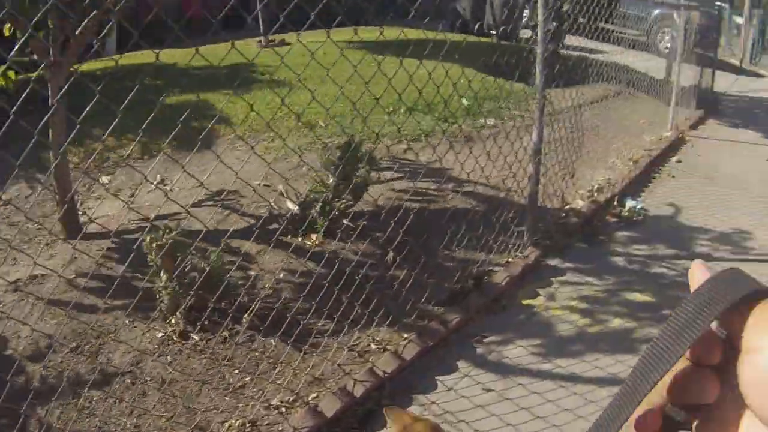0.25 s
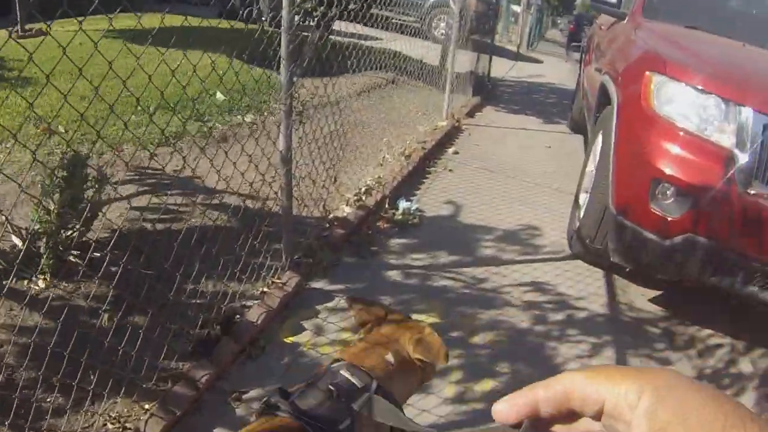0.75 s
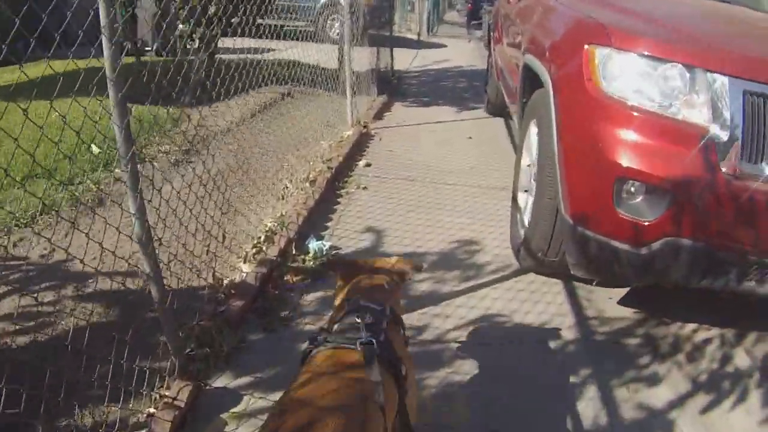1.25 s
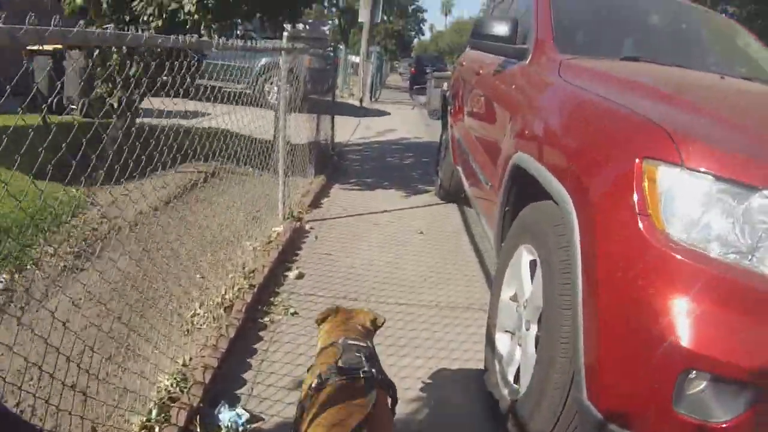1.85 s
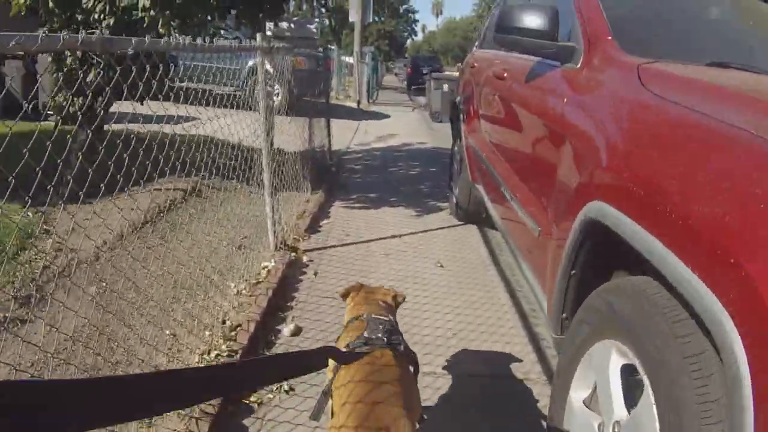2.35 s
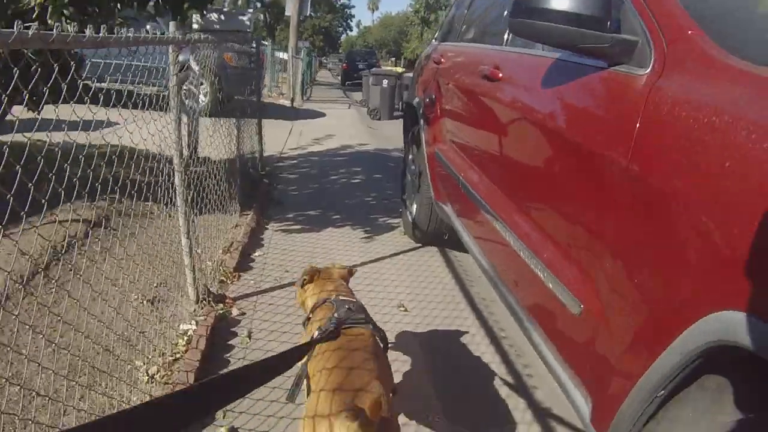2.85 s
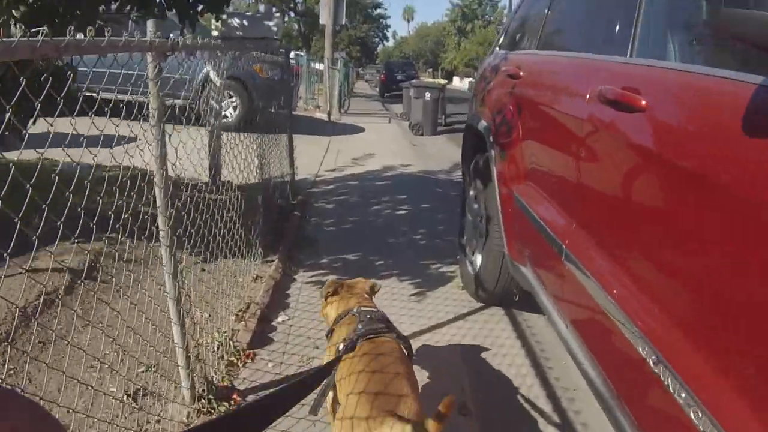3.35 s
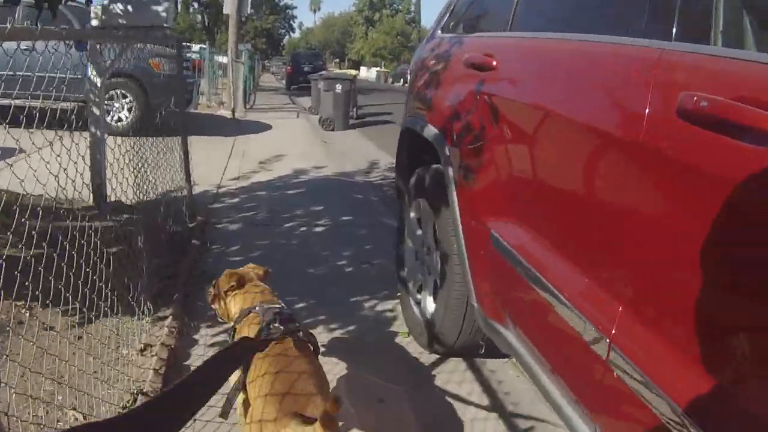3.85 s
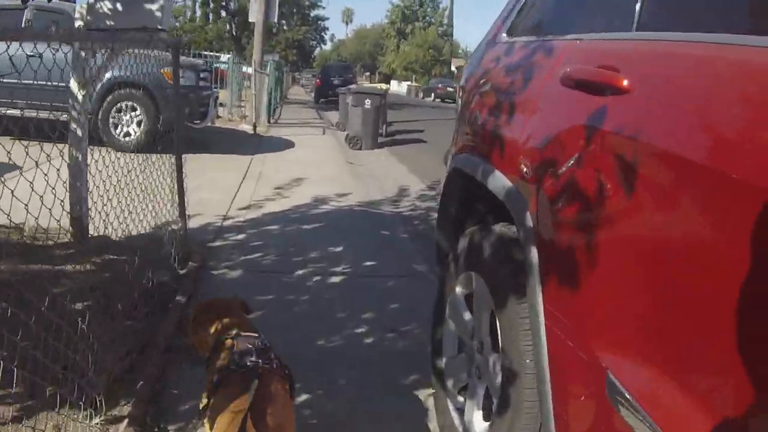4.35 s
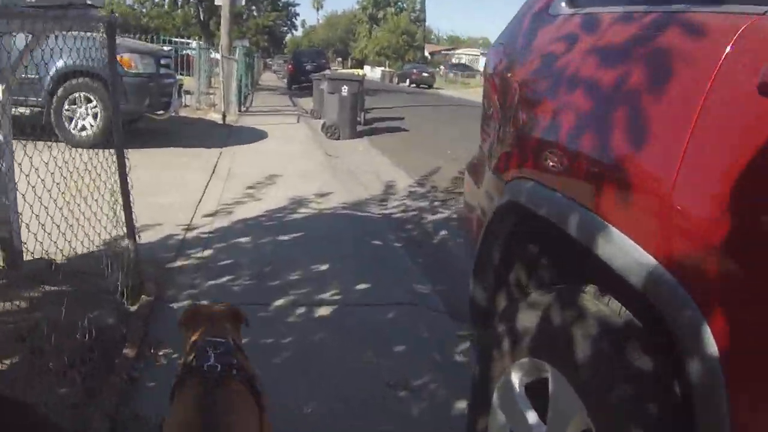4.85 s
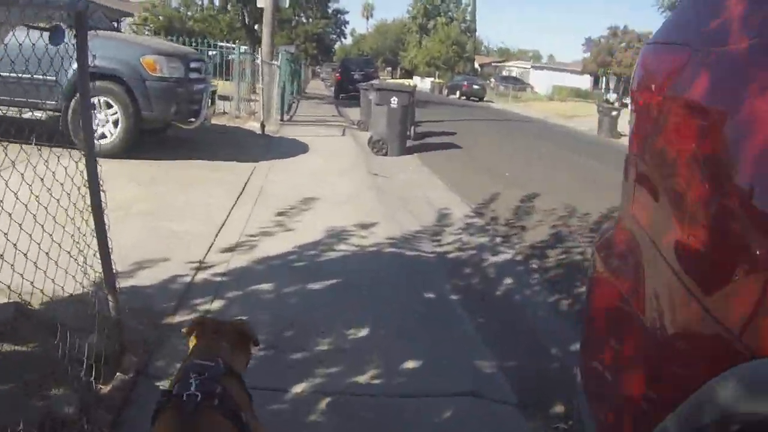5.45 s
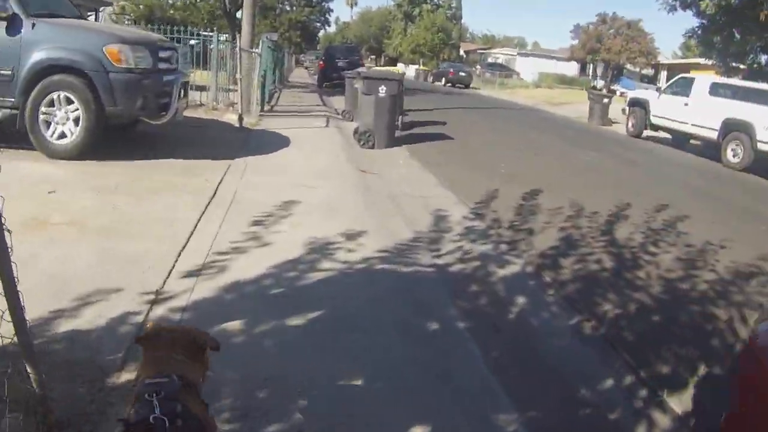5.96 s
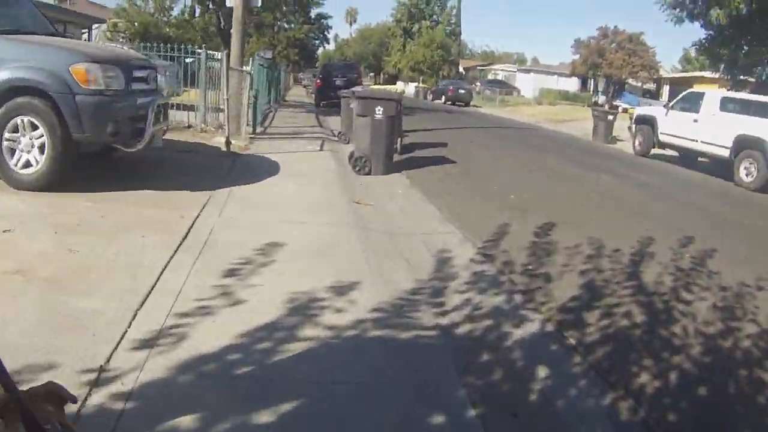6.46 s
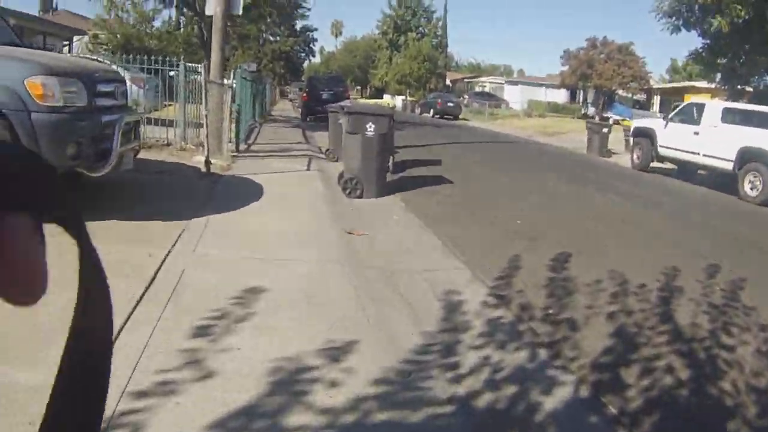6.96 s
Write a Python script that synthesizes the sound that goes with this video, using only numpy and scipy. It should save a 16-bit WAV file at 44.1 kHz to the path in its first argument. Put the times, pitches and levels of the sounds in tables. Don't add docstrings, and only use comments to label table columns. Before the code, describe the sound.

The microphone is sealed in a small plastic housing close behind a leashed dog, so everything is dry, boxy and near, with no room echo. A low steady hiss, thin high whine, faint fizz and weak ticks about ten times a second run throughout. The start is quiet, with a slight rub and tick, then a sharp hollow knock at 0.7 s and a tiny metallic chink at 0.9. Light ticks and scuffs follow until hard plastic clacks begin at 1.9 and 2.0. From 2.2 to 4.7 knocks, crisp taps, soft strap bumps and short muffled rubs come irregularly, strongest near 2.9, 3.0 and 3.7, with low lurches from footfalls. It thins out: a flat slap at 5.1, a knock at 5.7, a softer slap at 6.1. A small chink at 6.6 precedes closing knocks at 6.7, 6.9 and 7.0, then faint ticks.

```python
import sys
import numpy as np
from scipy import signal
from scipy.fft import rfft, irfft
from scipy.io import wavfile
from scipy.ndimage import uniform_filter1d

SR = 44100
rng = np.random.default_rng(int(sys.argv[2]) if len(sys.argv) > 2 else 0)


def file_out(sig):
    cols = np.atleast_2d(sig).T
    lim = np.clip(cols, -1, 1)
    pcm = np.round(lim * 32767).astype(np.int16)
    wavfile.write(sys.argv[1], SR, pcm)


def boost(x):
    u = np.asarray(x, float) / 20
    return 10 ** u


N = 318346

# frequency in Hz, density in dB per Hz.
HISS = [(100, -3.5), (300, 4.5), (1000, 4), (2000, 5.5), (4000, -1.5), (6500, -8), (8500, -11.5),
        (11500, -14), (15500, -13)]
# frequency in Hz, rms level in dB.
WHISTLES = [(5000, -82), (10999, -98), (11999, -93), (12999, -94), (13998, -98), (14998, -98)]

# start in seconds, length in seconds, level in dB, treble in dB
SLIDES = [(0.296, 0.217, -59.5, -12), (0.493, 0.117, -71.5, -14.5), (0.97, .12, -72, -5.5),
          (0.666, 0.1, -57, -11), (0.766, 0.211, -63, -6.5), (1.113, 0.252, -57.5, -8.5),
          (1.284, 0.054, -51, -10), (1.397, 0.0503, -54, -9), (1.445, 0.039, -61.5, -8.5),
          (1.633, 0.0678, -56, -6), (1.743, 0.1115, -52, -10), (1.881, 0.057, -47, -11),
          (2.076, 0.211, -50, -8.5), (2.28, 0.1435, -56, -9.5), (2.571, 0.0564, -51.5, -10),
          (2.709, 0.1046, -50, -10.5), (2.848, 0.049, -44, -9), (2.939, 0.11, -56, -14.5),
          (3.048, 0.084, -47.5, -8), (3.159, 0.1238, -50.5, -9), (3.316, 0.0948, -54, -8),
          (3.435, 0.0475, -59.5, -8), (1.518, 0.112, -67.5, -18), (2.421, 0.116, -62.5, -8.5),
          (3.525, 0.0787, -52.5, -8.5), (3.621, 0.059, -52, -6.5), (3.699, 0.0573, -52.5, -10),
                   (3.789, 0.0895, -48.5, -10), (3.998, 0.1415, -51.5, -9), (4.16, 0.074, -53.5, -7.5),
                   (4.25, 0.159, -55, -9), (4.424, 0.127, -53, -10.5), (4.606, 0.1147, -52.5, -7),
                   (4.75, 0.112, -53, -8), (4.963, 0.1686, -56.5, -9), (5.163, 0.0704, -52.5, -10),
                   (5.257, 0.1227, -56.5, -10.5), (5.511, 0.055, -59, -8), (5.628, 0.1048, -54.5, -10),
                   (5.76, 0.141, -59, -8.5), (5.951, 0.265, -61.5, -9.5), (6.22, 0.06, -56.5, -9.5),
                   (6.309, 0.087, -56, -9.5), (4.869, 0.094, -62, -8.5), (5.387, 0.094, -63, -16),
                   (6.44, 0.171, -61, -11.5), (6.66, 0.154, -56.5, -9.5), (6.856, 0.074, -51.5, -9.5),
                   (6.946, 0.0656, -56.5, -4), (7.098, 0.0357, -55.5, -9.5)]
# start in seconds, length in seconds, level in dB.
LURCHES = [(.75, 0.154, -54), (1.2, 0.065, -48), (1.28, 0.142, -52), (1.75, 0.114, -39.5),
           (1.88, 0.1706, -41), (2.18, 0.215, -44.5), (2.7, 0.229, -42), (3.14, 0.0994, -40),
           (3.28, 0.076, -46.5), (3.66, 0.081, -37.5), (3.8, 0.0726, -37), (4.08, 0.096, -37),
           (4.44, 0.07, -53), (4.62, 0.0783, -37.5), (5.1, 0.077, -45), (5.22, 0.0557, -47),
           (5.65, 0.0532, -38.5), (6.1, 0.095, -47.5), (6.7, 0.102, -43.5), (6.86, 0.127, -38.5),
           (1.58, .1, -54), (2.45, 0.046, -55.5), (3.42, 0.056, -50.5), (4.23, 0.059, -44.5),
           (4.8, 0.0574, -46), (5.85, 0.068, -52.5), (6.28, 0.114, -54.5)]
# frequency in Hz, width in Hz, level in dB.
RUB_RING = [(1207, 41.7, 15), (1822, 245, 21), (2066, 219.5, 18), (2480, 300, -84)]
RUB_TREBLE = [(3216, 391, 10), (3578, 29, -2), (4250, 599, 7), (5195, 1490, 4.5), (5950, 600, -47),
              (7810, 740, -13), (8600, 556, -3.5)]
RUB_BODY = [(123.3, 91.6, 7.5), (188.7, 170.3, 8), (292.3, 219, 5), (517.5, 174, 0.5), (671, 234, -3),
            (830, 95, -26.5)]

# start in seconds, body peak in dB, thud in dB relative to it, contact in ms.
BUMPS = [(0.242, -46.5, -20.5, 1), (0.708, -31.5, -5, 0.88), (1.287, -48, 7.5, 0.93), (2.188, -40, -18, 1),
         (2.2238, -24.5, -3.5, 0.625), (2.704, -25, -8.5, 0.72), (3.146, -33.5, -6, 1),
         (3.648, -32.5, -2, 0.69), (3.668, -28, -6.5, 0.69), (3.941, -39, 0, 0.4), (4.623, -32, -1.5, 0.98),
         (4.954, -43, 0.5, 0.56), (6.713, -23.5, -24, 0.4)]
BUCKLE_BUMPS = [
    (3.6275, -29, -4.5, 0.41),
]
# frequency in Hz, t60 in seconds, sign, level in dB under webbing, level in dB under the buckle.
PUSHED_WALLS = [(313.5, 0.0384, 0.703, -1, -1), (513, 0.058, 1, -17, -16), (678, 0.0234, 0.673, -1, 6),
                (1195, 0.0238, 0.74, -3.5, 7.5), (1660, 0.0129, 0.925, -7, 8.5)]

# start in seconds, ring peak in dB, ring in Hz, crack in dB relative.
TICKS = [(0.3985, -55, 1660, -18), (0.4759, -35.5, 1777, -12), (1.1147, -52, 1750, -18),
         (1.223, -40.5, 1660, -17.5), (1.311, -38, 1650, -18), (1.3423, -34.5, 1772, -18.5),
         (1.7424, -36.5, 1902, -4), (1.8188, -37.5, 2200, -17), (3.7913, -44.5, 1600, -18),
         (4.121, -38, 1682, -16.5), (4.787, -36, 1792, -10), (5.043, -32.5, 1680, -11.5),
         (5.154, -38.5, 1850, -16.5), (5.21, -42.5, 1690, -18), (5.2804, -43.5, 1880, -17.5),
         (5.5332, -37, 1660, -18.5), (6.0338, -39.5, 1828, -5), (6.08, -37.5, 1660, -19),
         (6.543, -44.5, 1970, -18), (7.125, -35.5, 1652, -17), (7.1983, -46, 1650, -19),
         (1.327, -35.5, 2010, -18.5), (1.4251, -42, 1734, -18), (4.148, -39.5, 1750, -20),
         (2.927, -46.5, 2174, -17.5)]
# start in seconds, ring peak in dB, then thud, body and crack in dB relative to it.
TAPS = [(1.7815, -23.5, -22, -12.5, -20), (2.2923, -30, -26, -22.5, -13.5),
        (2.3766, -17.5, -24.5, -33, -13.5), (3.108, -29, -33, -24.5, -18),
        (3.1551, -35.5, -1, -20.5, -17.5), (3.196, -27, -27, -34.5, -14), (3.3501, -23, -22, -49, -15),
        (3.49, -24, -21, -36, -11), (4.2736, -20.5, -21.5, -39.5, -14.5),
        (4.4295, -19.5, -21.5, -22.5, -17.5), (5.4445, -36.5, -10.5, -11.5, -23),
        (5.8225, -28, -16.5, -39.5, -13.5), (5.9689, -31.5, -18, -14, -11), (6.4586, -30, -16.5, -23, -16),
        (6.8717, -22, -28, -19, -9)]
# frequency in Hz, t60 in seconds, sign, level in dB.
TAPPED_WALLS = [(1240.3, 0.0161, -1.11, -11), (1661, 0.0109, -0.645, -0.5), (2100, 0.0058, -1.01, -0.5),
                (2385, 0.0093, 0.84, -3)]
# travel in ms, rebound delay in ms, rebound in dB, rattle in dB,
# rattle t60 in seconds, thud delay in ms.
LIGHT_BLOW = (0.3059, 4.18, -32.5, -25.5, 0.0066, 0.34)
# frequency in Hz, t60 in seconds, sign, then level in dB when
THUD = [(105.9, 0.0683, -0.079, 17, 8.5, 15.5), (196.4, 0.00483, -1.35, -2, -8, -2.5)]
BODY = [(316.1, 0.076, 0.66, -3, -1, 3.5), (508.7, 0.13, -0.68, -17.5, -12.5, -8),
        (733, 0.028, 1, -3.5, 3.5, 2), (934, 0.028, 0.24, -23, -3, -21.5)]
CRACK = [(2993.4, 0.00835, -0.697, -3, 8, 8), (3512, 0.0266, 0.076, 5, 5.5, -14.5),
         (4160, 0.0085, 0.614, -3.5, -0.5, 3.5), (4539, 0.0232, -0.488, -13.5, -14, -13.5),
         (5026, 0.0117, 0.896, -8, -15.5, -7.5), (5930, 0.00826, -1.52, -19, -22.5, -8),
         (7010, 0.00422, 1.34, -8, -34, -10), (8565, 0.00463, -1.334, -9, -28, -6),
         (10640, 0.00197, 1.1, -10.5, -31, -29), (13300, 0.0025, 0.5, -19, -27.5, -25)]
# frequency in Hz, t60 in seconds, sign, level in dB.
ROCKING = [(66, 0.045, -1, 0)]

# start in seconds, peak in dB, centre in Hz, length in ms, width in Hz.
CHINKS = [(.907, -46.5, 10160, 5.6, 500), (0.908, -45, 4910, 5.6, 1000), (.908, -56.5, 7200, 5, 900),
          (.911, -47.5, 3260, 4.2, 600), (1.69, -62, 9800, 14, 700), (3.607, -60, 10140, 7, 200),
          (4.15, -53, 10060, 12, 1500), (4.161, -54.5, 9830, 8.2, 700), (6.627, -41, 3310, 2.3, 500),
          (6.628, -48, 4730, 2.36, 700), (6.628, -58.5, 7500, 3.2, 530), (6.742, -47.5, 3420, 3.1, 250),
          (6.91, -54.5, 11000, 36, 6000), (2.674, -50.5, 3350, 36, 240), (.711, -61.5, 10500, 12, 5000),
          (.78, -64, 10000, 4, 4000), (3.616, -60.5, 13500, 4, 3000), (3.626, -62, 13000, 4, 3000)]
BRUSHES = [
    (1.113, -47.5, 1050, 3.8, 300),
    (1.115, -52, 3290, 6, 700),
    (5.09, -48, 189, 16.4, 70),
    (6.755, -42, 85, 15, 60),
    (6.94, -41.5, 817, 39, 110),
    (.55, -49, 298, 4.94, 250),
    (1.927, -31, 1905, 6.6, 900),
]
# frequency in Hz, t60 in seconds, sign, level in dB.
RINGING_TAG = [(12200, .045, 1, 1.5), (11000, .04, 1, -6.5)]

# start in seconds, ring peak in dB, then thud, body and crack in dB relative to it.
SWINGS_IN = [(0.7297, -6.5, -10.5, -16, -18), (2.0175, -9.5, -11, -8.5, -26.5),
             (2.2266, -16, -23.5, -21, -45), (2.7111, -21, -26.5, -16.5, -39.5),
             (2.9945, -8, -11.5, -9.5, -24.5), (3.6825, -5, -13, -15, -18), (3.9688, -13, -10.5, -8, -34),
             (4.6619, -11.5, -13.5, -11, -16.5), (5.6702, -16.5, -11, -7.5, -24),
             (6.7245, -15, -14, -14, -27), (6.9747, -8, -11.5, -6.5, -24)]
SWINGS_BACK = [
    (1.9328, -5, -9.5, -15.5, -16.5),
    (2.8858, -4.5, -9, -16.5, -14.5),
    (3.8594, -10, -7, -10.5, -21.5),
    (4.4786, -19.5, -4.5, -13.5, -42.5),
]
GLANCING = [
    (6.9073, -8.5, -7, -8.5, -19),
]
# frequency in Hz, t60 in seconds, sign, level in dB.
WALLS_IN = [(312.4, 0.071, 1, -17), (495, 0.0756, -0.45, -32), (696.8, 0.0278, 1, -10.5),
            (1049.6, 0.0276, -1.2, -16.5), (1245.4, 0.01426, -1.15, -2), (1493.5, 0.0143, 0.873, -7.5),
            (1726.5, 0.0228, -1.074, 8), (1931, 0.0178, 0.808, 2.5), (2109.7, 0.014, -0.993, 9),
            (2476, 0.0098, 0.915, 5)]
WALLS_BACK = [(300, 0.0423, -0.684, -6), (500, 0.047, -1.5, -18.5), (741, 0.01494, 0.844, -6.5),
              (996, 0.00627, 0.99, 5.5), (1203.2, 0.0181, -1.02, 2.5), (1480, 0.0172, 0.98, -18.9),
              (1650, 0.0141, -1.09, 7), (1762.3, 0.0166, 1, 9.5), (1975, 0.00677, -1.074, 6.5),
              (2455, 0.008, 0.975, 9)]
WALLS_EDGE = [(343.7, 0.055, 1, -16.5), (546, 0.0272, -1, -9.5), (640.7, 0.0375, 0.99, -9.5),
              (1028, 0.00536, -0.895, 10.5), (1183, 0.0486, -1.03, -5.5), (1441, 0.034, -0.9, -4.5),
              (1677, 0.0282, -1.06, -1.05), (1853, 0.0224, -1.01, 6), (2069, 0.0118, 1, 7.5),
              (2233, 0.01465, -1, 15.5)]
# frequency in Hz, t60 in seconds, sign, level in dB.
THUD_IN = [(66.1, 0.06, -0.92, -7), (107.5, 0.0576, -1.01, -4), (177.8, 0.083, -1.05, -23)]
THUD_BACK = [(70, 0.0564, 1, 0.5), (100.1, 0.069, 1, -7.5), (208.8, 0.0249, 0.994, -9)]
# frequency in Hz, t60 in seconds, sign, level in dB swinging in,
# level in dB swinging back.
PANELS = [(495.8, 0.1473, -1.02, -7, -8.5), (1190.3, 0.072, 0.91, -25, 0.0),
          (1901.4, 0.0666, -1.06, 0.5, -24.5), (4654, 0.048, 1, -13.5, -31)]
# contact in ms, rise in ms, rebound delay in ms, rebound share, delay of the slow
# parts in ms, crack delay in ms, second crack in ms after it, its level in dB, rattle in dB,
# rattle t60 in seconds, first touch in ms.
BLOW_IN = (0.5592, 0.3274, 1.13, -0.0743, 0.69, 0.88, -0.4951, -9, -29, 0.054, 0.09)
BLOW_BACK = (0.534, 1.0, 1.4366, 0.6223, 1.5339, 1.0, 1.65, -5, -27.5, 0.1443, -0.43)
BLOW_EDGE = (0.57, 1.5, 2.5, 0.43, 1, 1.9, -0.1, -1.5, -20, 0.0551, -0.28)

# start in seconds, peak in dB, thud in dB relative to it.
SLAPS = [
    (5.0738, -22.5, -13.5),
    (6.1085, -26.5, -13.5),
]
PATS = [
    (1.7797, -22.5, -30),
    (4.0938, -23.5, -17.5),
    (4.1418, -27, -6.5),
]
# frequency in Hz, t60 in seconds, sign, level in dB.
SLAPPED_WALLS = [(309, 0.00636, 1, 11.5), (484, 0.1, -0.95, -31.5), (690, 0.00613, 0.99, 10),
                 (1261, 0.036, -0.99, -5), (1730, 0.03, -1.004, 10), (2177, 0.0202, -1.02, 10)]
PATTED_WALLS = [(316.2, 0.0376, 0.98, -1.23), (515, .1, 0.98, -27.5), (687, 0.0355, 1, -3),
                (996, 0.00494, 0.98, 18), (1132, 0.049, -1.01, 9)]
STRAP_THUD = [(118.3, 0.0353, 1, 0)]

# start in seconds, length in seconds.
TOP_DROPOUTS = [(0.473, 0.02), (0.719, 0.008), (0.898, 0.007), (1.786, 0.009), (2.019, 0.01),
                (2.222, 0.018), (2.383, 0.008), (2.691, 0.008), (2.719, 0.015), (2.885, 0.019),
                (3.182, 0.02), (3.493, 0.009), (3.644, 0.01), (3.658, 0.017), (3.851, 0.007), (3.95, 0.022),
                (3.98, 0.012), (4.27, 0.021), (4.42, 0.02), (4.449, 0.03), (4.655, 0.019), (5.063, 0.009),
                (5.528, 0.018), (5.657, 0.014), (5.806, 0.02), (5.955, 0.021), (6.449, 0.017),
                (6.627, 0.011), (6.702, 0.02), (6.852, 0.017), (6.874, 0.024)]


def unit(x):
    return x / np.sqrt(np.mean(x ** 2))


def band(x, hz, width):
    return signal.lfilter(*signal.iirpeak(hz, hz / width, fs=SR), x)


def walk(rate):
    k = int(SR / rate)
    steps = np.repeat(rng.standard_normal(N // k + 1), k)
    return unit(uniform_filter1d(uniform_filter1d(steps, k), k)[:N])


def add(out, sound, s):
    i = int(s * SR)
    out[i:i + len(sound)] += sound[:len(out) - i]


def swells(rows, edge_s):
    out = np.zeros(N)
    for s, length, db in rows:
        t = np.arange(int((length + edge_s) * SR)) / SR
        ends = np.clip(np.minimum(t, length + edge_s - t) / edge_s, 0, 1)
        add(out, (boost(db) * np.sin(np.pi / 2 * ends)) ** 2, s - edge_s / 2)
    return out


def slide_power(treble=False):
    rows = [(s, length, db + treble * treble_db)
            for s, length, db, treble_db in SLIDES]
    return swells(rows, 0.04)


def ring(modes, column, contact_ms, rise_ms):
    hz, t60, sign, db = np.array(modes)[:, [0, 1, 2, column]].T
    pitch_chance, level_chance = rng.standard_normal((2, len(hz)))
    t = np.arange(SR // 6)[:, None] / SR
    walls = np.cos(2 * np.pi * hz * (1 + 0.00237 * pitch_chance) * t) * np.exp(-np.log(1000) * t / t60)
    walls = walls @ (sign * boost(db + 0.5 * level_chance))
    walls = walls * (1 - np.exp(-(t[:, 0] * 1000 + 0.00297) / rise_ms))
    u = np.arange(256) / SR / (max(contact_ms, 0.05) / 1000)
    push = np.sin(np.pi * u[u < 1]) ** 2
    out = np.convolve(walls, push)[:len(t)]
    return out / np.abs(out).max()


def loose_rattle(hz, width, t60):
    t = np.arange(SR // 6) / SR
    noise = rng.standard_normal(len(t))
    for _ in range(3):
        noise = band(noise, hz, width)
    return unit(noise) * np.exp(-np.log(1000) * t / t60)


def hiss():
    hz, db = np.transpose(HISS)
    bins_hz = np.arange(1, N // 2 + 2) * SR / N
    colour = boost(np.interp(np.log(bins_hz), np.log(hz), db))
    return boost(-62.5) * unit(irfft(rfft(rng.standard_normal(N)) * colour, N))


def clock_whistles():
    t = np.arange(N) / SR
    return sum(boost(db) * np.sqrt(2) * np.sin(2 * np.pi * hz * t) for hz, db in WHISTLES)


def sparks():
    spark_s, gap_s, jitter = 0.0012, 0.0088, 0.12
    pace, level = rng.standard_normal((int(N / SR / gap_s / 2) * 3, 2)).T
    at = (np.cumsum(gap_s * np.exp(jitter * pace)) * SR).astype(int)
    train = np.zeros(N)
    train[at[at < N]] = boost(3.0 * level[at < N])
    return unit(0.3 + np.convolve(train, np.hanning(int(2 * spark_s * SR)), "same"))


def fizz():
    period_s, peak_s, width_s = 0.284, 0.19, 0.0314
    t = np.arange(N) / SR
    off_peak = (t - peak_s + period_s / 2) % period_s - period_s / 2
    awake = boost(-86.5) + boost(-83.5) * np.exp(-(off_peak / width_s) ** 2 / 2)
    shaken = boost(-37.5) * np.sqrt(slide_power())
    noise = unit(band(band(rng.standard_normal(N), 10370, 900), 10370, 1100))
    return (awake + shaken) * sparks() * noise


def radio_ticks():
    start_s, period_s, burst_s = 0.0395, 0.10238, 0.0032
    t = np.arange(N) / SR - start_s
    beat = (t // period_s).astype(int) + 1
    level = boost(-67 + 3.0 * rng.standard_normal(beat.max() + 1))[beat]
    ticks = level * (t % period_s < burst_s) * rng.standard_normal(N)
    return band(ticks, 4400, 5000) + boost(2.5) * band(ticks, 9850, 6000)


def rubbing(lurch):
    grains = np.minimum(rng.exponential(size=N // 60 + 1), 2.5).repeat(60)[:N]
    grit = rng.standard_normal(N) * boost(1.9 * grains)
    slide = slide_power()
    handling = boost(-61.5) ** 2 + boost(-4.5) ** 2 * slide + boost(-16) ** 2 * lurch
    slips = boost(1.8 * walk(70))
    out = np.zeros(N)
    for power, peaks, top_hz in ((slide + boost(-73) ** 2, RUB_RING, 2470),
                                 (slide_power(treble=True) + boost(-77) ** 2, RUB_TREBLE, 6400),
                                 (handling, RUB_BODY, 1020)):
        dull = signal.sosfilt(signal.butter(3, top_hz, fs=SR, output="sos"), grit)
        colour = np.zeros(N)
        for hz, width, db in peaks:
            resonance = unit(band(band(dull, hz, width), hz, 3 * width))
            colour += boost(db + 2.0 * walk(14)) * resonance
        out += np.sqrt(power) * slips * unit(colour)
    return out


def lurching(lurch):
    sway = unit(band(band(rng.standard_normal(N), 20.55, 31.7), 20.55, 31.7))
    tremor = unit(band(band(rng.standard_normal(N), 67.2, 76), 67.2, 76))
    moving = np.sqrt(lurch + boost(-63.5) ** 2) * sway + boost(-66.5) * tremor
    return moving * boost(1.8 * walk(31))


def bumps():
    out = np.zeros(N)
    for table, column, travel_s in ((BUMPS, 3, 0), (BUCKLE_BUMPS, 4, 0.0008)):
        for s, db, thud_db, contact_ms in table:
            walls = ring(PUSHED_WALLS, column, contact_ms, 0.27)
            thud = boost(thud_db) * ring(THUD, 3, 0.715, 0.33)
            add(out, boost(db + 2.0) * (walls - thud), s + travel_s)
    return out


def light_knocks(table, walls, way):
    travel_ms, rebound_ms, rebound_db, rattle_db, rattle_s, slow_ms = LIGHT_BLOW
    tapped = 5
    out = np.zeros(N)
    for s, db, thud_db, body_db, crack_db in table:
        s += travel_ms / 1000
        slow_s = s - 0.0003 + slow_ms / 1000
        thud = ring(THUD, tapped, 1.0, 0.19) + boost(-34) * ring(ROCKING, 3, 2.5, 0.26)
        add(out, way * boost(db + thud_db + 6.5) * thud, slow_s)
        add(out, way * boost(db + body_db + 2.5) * ring(BODY, tapped, 0.18, 0.25), slow_s)
        for ms, share_db in ((0, 0), (rebound_ms, rebound_db)):
            quick = ring(walls, 3, 0.388, 0.4) + boost(crack_db + 1.0) * ring(CRACK, tapped, 0.154, 1.0)
            add(out, way * boost(db - 3.0 + share_db) * quick, s - 0.0006 + ms / 1000)
        add(out, boost(db + rattle_db) * loose_rattle(1540, 1800, rattle_s), s)
    return out


def wall_ticks():
    out = np.zeros(N)
    for s, db, hz, crack_db in TICKS:
        one_wall = [(hz, 0.022, 1, 0)]
        out += light_knocks([(s, db + 3.5, -22, -26, crack_db)], one_wall, 0.5)
    return out


def chinks_and_brushes():
    out = np.zeros(N)
    for s, db, hz, ms, width in CHINKS + BRUSHES:
        u = np.arange(SR // 20) / SR / (ms / 1000)
        burst = rng.standard_normal(len(u)) * u ** 0.35 * np.exp(-1.5 * u ** 2)
        rattle = band(band(burst, hz, width), hz, 2 * width)
        add(out, boost(db) * rattle / np.abs(rattle).max(), s)
    add(out, boost(-55.5) * ring(RINGING_TAG, 3, 0.05, 1.0), 0.907)
    return out


def hard_swings(table, walls, thud, column, blow):
    (contact_ms, rise_ms, rebound_ms, rebound_share, slow_ms, crack_ms,
     again_ms, again_db, rattle_db, rattle_s, early_ms) = blow
    out = np.zeros(N)
    for s, db, thud_db, body_db, crack_db in table:
        s += early_ms / 1000
        quick = boost(db) * ring(walls, 3, contact_ms, rise_ms)
        add(out, quick, s)
        add(out, rebound_share * quick, s + rebound_ms / 1000)
        slow = boost(db + thud_db) * ring(thud, 3, 0.067, 1.0)
        slow = slow + boost(db + body_db - 15) * ring(PANELS, column, 0.172, 2.3)
        add(out, slow, s + slow_ms / 1000)
        crack_contact_ms = 0.0818 + 0.3034 * crack_db
        for ms, less_db in ((0, 0), (again_ms, again_db)):
            crack = ring(CRACK, column, crack_contact_ms, 0.95)
            add(out, boost(db + crack_db + less_db) * crack, s + (crack_ms + ms) / 1000)
        add(out, boost(db + rattle_db) * loose_rattle(1635, 2000, rattle_s), s + 0.0008)
    return out


def slaps():
    out = np.zeros(N)
    for table, modes, contact_ms, rise_ms, bounce in ((SLAPS, SLAPPED_WALLS, 0.78, 1.0, -0.34),
                                                      (PATS, PATTED_WALLS, 1.9, 0.05, 0)):
        for s, db, thud_db in table:
            thud = boost(thud_db) * ring(STRAP_THUD, 3, contact_ms, rise_ms)
            push = boost(db) * (ring(modes, 3, contact_ms, rise_ms) + thud)
            add(out, push, s)
            add(out, bounce * push, s + 0.0023)
    return out


def scene():
    circuits = hiss() + clock_whistles() + fizz() + radio_ticks()
    lurch = swells(LURCHES, 0.0495)
    strap = rubbing(lurch) + lurching(lurch) + bumps() + slaps()
    light = wall_ticks() + light_knocks(TAPS, TAPPED_WALLS, 0.838) + chinks_and_brushes()
    hard = hard_swings(SWINGS_IN, WALLS_IN, THUD_IN, 3, BLOW_IN)
    hard = hard + hard_swings(SWINGS_BACK, WALLS_BACK, THUD_BACK, 4, BLOW_BACK)
    hard = hard + hard_swings(GLANCING, WALLS_EDGE, THUD_BACK, 4, BLOW_EDGE)
    return (circuits + strap + light + hard)[None]


def roll_off(x):
    return signal.sosfilt(signal.butter(12, 15150, fs=SR, output="sos"), x)


def record(dry):
    dry = signal.sosfilt(signal.ellip(8, 0.2, 60, 15200, fs=SR, output="sos"), dry)
    top = signal.sosfiltfilt(signal.butter(8, 13200, "high", fs=SR, output="sos"), dry)
    lost = np.minimum(swells([(s, length, 0) for s, length in TOP_DROPOUTS], 0.003), 1)
    mix = signal.lfilter(*signal.butter(1, 18, "high", fs=SR), dry - top * lost)
    return roll_off(mix)


dry = scene()
out = record(dry)
file_out(out)
```